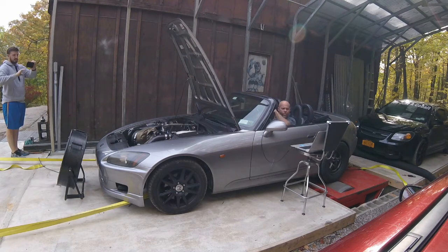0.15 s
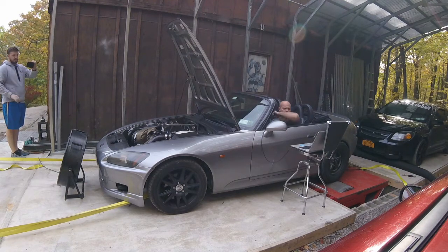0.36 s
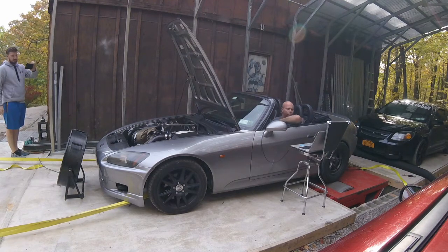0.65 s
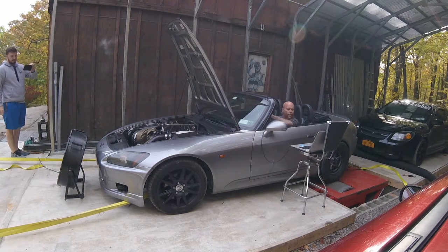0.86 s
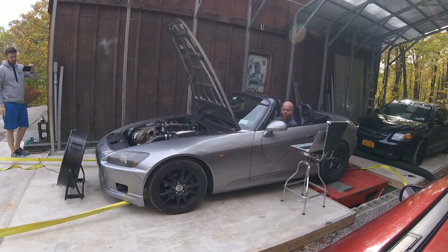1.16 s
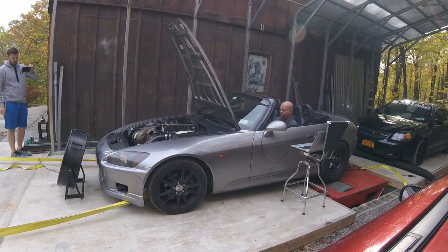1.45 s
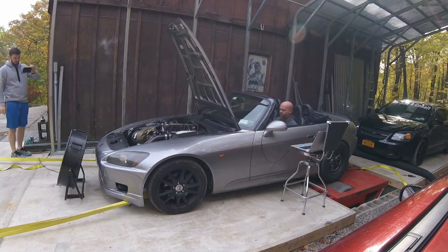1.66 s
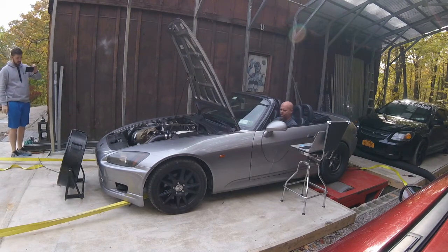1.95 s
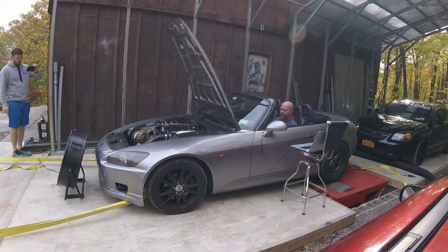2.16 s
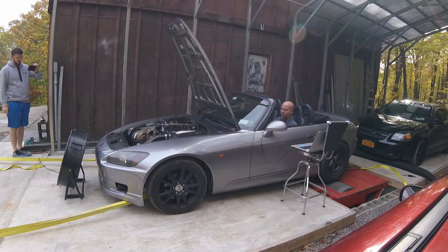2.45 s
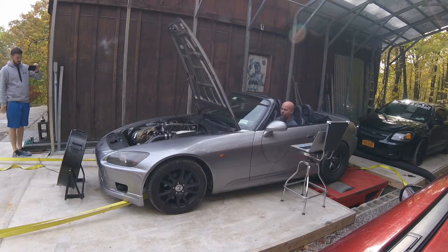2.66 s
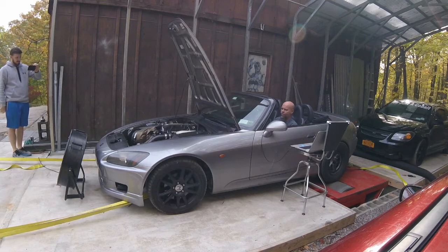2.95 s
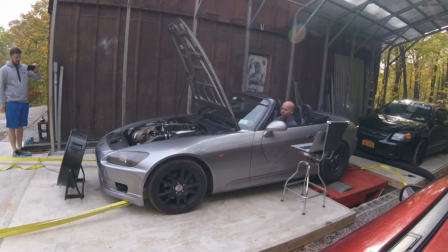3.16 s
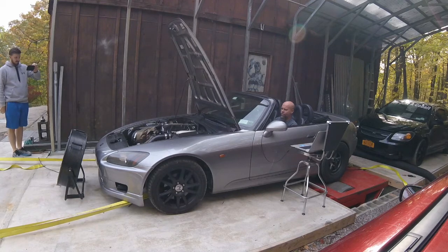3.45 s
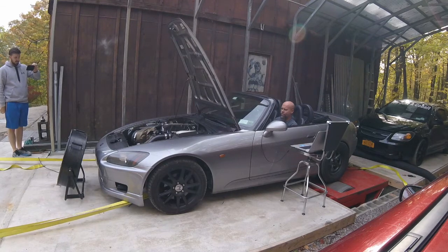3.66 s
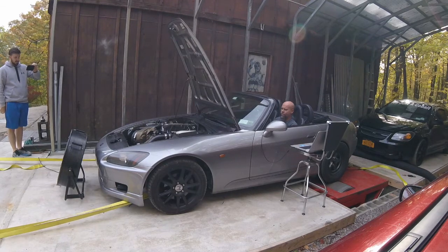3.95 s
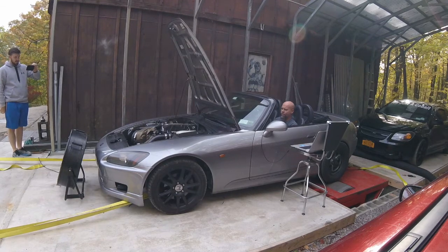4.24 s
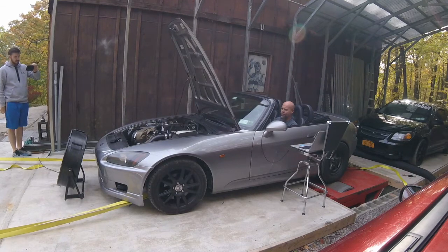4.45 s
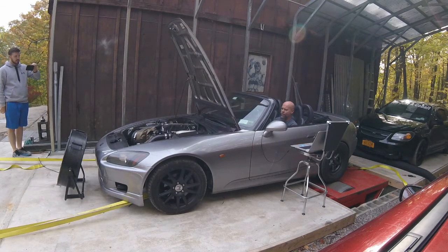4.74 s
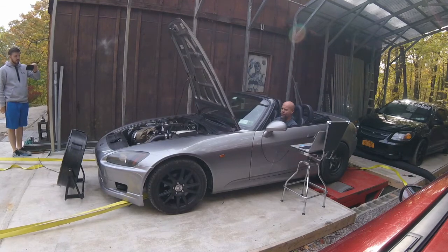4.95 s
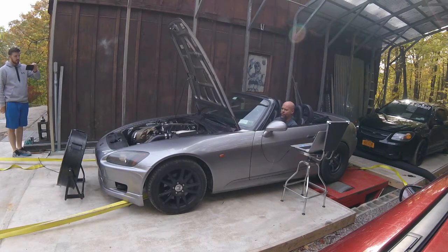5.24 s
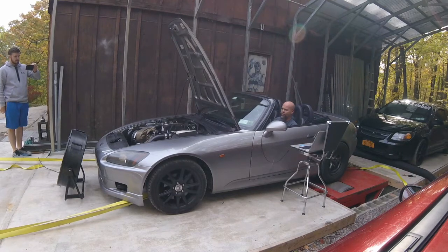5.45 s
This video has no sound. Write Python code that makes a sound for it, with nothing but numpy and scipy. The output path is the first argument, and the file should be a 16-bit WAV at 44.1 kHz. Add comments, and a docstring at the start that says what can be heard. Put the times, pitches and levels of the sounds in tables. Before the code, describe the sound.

Low, bassy exhaust throb with raspy puffs and light mechanical rattle from an open engine bay holds briefly, then the revs nearly double in one continuous sweep. Boom and burble pass through resonances, surging and sagging slightly, while turbo hiss and singing intake tones brighten and grow loud. Short reverberation of a semi-open shed; close mono pickup on the left, right side practically silent.

```python
"""A turbocharged four-cylinder car on a chassis dynamometer in an open shed, one microphone a few metres off.
It cruises near 1900 rpm: the exhaust booms on the firing rate and burbles on its quarters, noise puffs rasp
in the pipe, and under the open bonnet the valve gear clatters and meshing teeth whine.
From about 1.3 s it pulls, reaching about 3700 rpm: the lines sweep through the resonances of pipe and shed,
single lines flare, and the turbo's filtered noise grows and brightens with boost over singing intake pipes."""
import sys
import numpy as np
from scipy import signal
from scipy.fft import rfft, irfft, next_fast_len
from scipy.io import wavfile

SR = 44100
rng = np.random.default_rng(int(sys.argv[2]) if len(sys.argv) > 2 else 0)


def log_audio(samples):
    """Write samples as a 16-bit WAV file to the path given in sys.argv[1]."""
    # one column per channel
    frames = np.atleast_2d(samples).T
    # limit to full scale, then quantise
    limited = np.clip(frames, -1, 1)
    pcm = np.round(limited * 32767).astype(np.int16)
    wavfile.write(sys.argv[1], SR, pcm)


N = 246078  # samples

CRUISE_HZ = 63.03  # firings a second before the pull


def amp(db):
    """Decibels to gain."""
    return 10 ** (np.asarray(db) / 20)


def unit(x):
    """Scale to rms 1."""
    return x / np.sqrt(np.mean(x ** 2) + 1e-20)


def along(points, hz):
    """Interpolate (Hz, value) points on a log frequency axis."""
    point_hz, value = np.transpose(points)
    return np.interp(np.log(hz + 1), np.log(point_hz + 1), value)


def curves(rows):
    """One value per sample for each column after the time."""
    time_s, *columns = np.transpose(rows)
    return [np.interp(np.arange(N) / SR, time_s, column) for column in columns]


def wobble(rate):
    """A smooth random curve, rate knots a second."""
    knots = rng.standard_normal(int(N * rate / SR) + 4)
    fine = signal.resample_poly(knots, 16, 1)
    return np.interp(np.arange(N) * rate / SR, np.arange(len(fine)) / 16, fine)


def filtered(x, response):
    """Multiply the spectrum of x by a response of frequency."""
    size = next_fast_len(N + SR // 2)  # padded, so that the end does not wrap onto the start
    hz = np.fft.rfftfreq(size, 1 / SR)
    return irfft(rfft(x, size) * response(hz), size)[:N]


def coloured(x, spectrum):
    """Pass x through a smooth spectrum, at rms 1."""
    return unit(filtered(x, lambda hz: amp(along(spectrum, hz))))


def peaks(modes, hz, skirt=1.5):
    """Gain of a set of resonances, summed in power; a larger skirt makes their sides steeper."""
    power = sum(amp(2 * db) / (1 + (2 * (hz - centre) / width) ** 2) ** skirt
                for centre, width, db in modes)
    return np.sqrt(power)


def resonant(x, modes):
    """Pass x through a set of resonances, at rms 1."""
    return unit(filtered(x, lambda hz: peaks(modes, hz)))


def puffs(count, cylinder_db, scatter_db, decay, diffuse):
    """Noise that bursts at each firing, unequal by cylinder, over a steady share scattered by the shed."""
    index = count.astype(int)
    size_db = np.asarray(cylinder_db)[index % 4] + scatter_db * rng.standard_normal(4096)[index]
    burst = unit(amp(size_db) * np.exp(-(count % 1) / decay))  # decay in firing intervals
    return unit(np.hypot(burst, diffuse) * rng.standard_normal(N))


def firing_rate():
    """Firings a second: a steady cruise, then the dynamometer lets the revs climb near-exponentially."""
    start_s, ease_s = 1.316, .197
    octaves_per_s, quickens_per_s = .1998, .0285
    pulling_s = ease_s * np.logaddexp(0, (np.arange(N) / SR - start_s) / ease_s)
    return CRUISE_HZ * 2 ** (octaves_per_s * pulling_s * (1 + quickens_per_s * pulling_s))


def effort(firing_hz, cruise_db, surge_db, octave_db, steepness, early_s=0):
    """Level in dB of a layer: cruise, a passing surge (early_s ahead), and octave_db more at twice the revs."""
    peak_s, rise_s, fall_s, recover_s = 2.403, 1.47, 0.33, 0.99
    sag_share = 0.21  # depth of the sag over the height of the surge
    corners_s = peak_s - early_s + np.array([-rise_s, 0, fall_s, fall_s + recover_s])
    surge = np.interp(np.arange(N) / SR, corners_s, [0, 1, -sag_share, 0])
    climb = np.abs(np.log2(firing_hz / CRUISE_HZ)) ** steepness
    return cruise_db + surge_db * surge + octave_db * climb


def shed(x, wet_db):
    """The direct sound plus the answer of walls and roof: noise dying away at its own rate in each band."""
    # reverberation of the shed: frequency_hz, t60_s
    reverberation = [(200, 0.33), (2000, 0.26), (10000, 0.067)]
    hz, t, bands = signal.stft(rng.standard_normal(SR // 2), SR, nperseg=256)
    decay = amp(-60 * t / along(reverberation, hz)[:, None])
    tail = signal.istft(bands * decay, SR, nperseg=256)[1]
    return x + amp(wet_db) * signal.fftconvolve(x, tail / np.linalg.norm(tail))[:N]


def whine(firing_hz, load, wander=0.00249, haze_db=3.5, haze_load_db=-4):
    """Meshing teeth sing a wavering line and its octave; rattle in their play blurs it, less under load."""
    # level of the whine at each pitch, falling steeply above 6.5 kHz: frequency_hz, relative level_db
    whine_level = [(3200, -55.5), (3550, -55.5), (4000, -54.5), (4650, -53.5), (5500, -50.5), (5950, -46.5),
                   (6500, -59), (6900, -77), (7600, -90.5)]
    mesh_per_firing = 51.8
    turn = 2 * np.pi * mesh_per_firing * np.cumsum(firing_hz * (1 + wander * wobble(7))) / SR
    haze = amp(haze_db + haze_load_db * load)

    def band(k, width):
        return unit(wobble(width) * np.cos(k * turn) + wobble(width) * np.sin(k * turn))

    def line(k):
        core = band(k, 85)
        blur = unit(band(k, 200) + band(k, 600))
        return core + haze * blur

    return sum(amp(along(whine_level, k * mesh_per_firing * firing_hz)) * line(k) for k in (1, 2))


def intake(firing_hz, off_speed_db=-58, flutter_db=1.0):
    """Each intake resonance rings on noise, swells as the revs pass its own speed, and flutters with the flow."""
    # intake pipe resonances: frequency_hz, width_hz, relative level_db, best speed in firings a second
    pipes = [(920, 41, -11.5, 98), (1040, 150, -6, 87.5), (1450, 130, -8.5, 99), (2115, 300, -11, 99),
             (3670, 65, -14.5, 89), (4140, 450, -15, 99), (4470, 130, -17, 81), (4830, 150, -10, 101),
             (7650, 80, -27, 120), (9540, 230, -32, 106)]
    out = np.zeros(N)
    for hz, width, db, best_hz in pipes:
        level_db = db + off_speed_db * np.log2(firing_hz / best_hz) ** 2 + flutter_db * wobble(6)
        out += amp(level_db) * resonant(rng.standard_normal(N), [(hz, width, 0)])
    return out


def turbo(count, firing_hz, load, air_db=-1.77, sizzle_db=-7.5, boost_from=0.9):
    """Air rushes through the compressor, brighter with boost, and sets the intake pipes singing."""
    # air noise at cruise and toward full boost: frequency_hz, relative level_db
    air_cruise = [(1500, -42), (3000, -15), (4000, -9), (4600, -2.5), (5700, -2.5), (6500, -2.5),
                  (6850, -11), (8000, -16.5), (9100, -23), (10900, -27.5), (12200, -34), (15000, -59)]
    air_boost = [(1500, -22), (2300, -10), (3200, -11.5), (4100, -8.5), (4700, -4), (5400, -4), (6450, -4),
                 (6850, -14.5), (8000, -14.5), (9100, -21.5), (10900, -21.5), (12200, -35), (14200, -26),
                 (15000, -55.5)]
    # narrow sizzle in the air noise: frequency_hz, width_hz, relative level_db
    sizzle_modes = [(6240, 490, 4), (6420, 150, 4.5)]
    level_db = effort(firing_hz, cruise_db=-46.0, surge_db=5.0, octave_db=19.5, steepness=1.96)
    boost = np.clip(load - boost_from, 0, 1)
    flow = puffs(count, [.5, 0, -.5, 0], scatter_db=3, decay=.9, diffuse=2.4)
    rush = (1 - boost) * coloured(flow, air_cruise) + boost * coloured(flow, air_boost)
    sizzle = resonant(rng.standard_normal(N), sizzle_modes)
    return amp(level_db) * (amp(air_db) * rush + amp(sizzle_db) * sizzle + intake(firing_hz))


def clatter(count, firing_hz):
    """Valves and injectors rattle the block in step with the firings."""
    # spectrum of the rattling block: frequency_hz, relative level_db
    block = [(20, -55), (300, -5), (650, -0.5), (1000, -2.5), (1300, -4), (1750, -5), (2200, -4.5),
             (2900, -8), (3800, -9.5), (6000, -21.5), (9000, -45), (14000, -64.5)]
    level_db = effort(firing_hz, cruise_db=-39.5, surge_db=3.0, octave_db=10.5, steepness=3.96)
    rattle = puffs(count, [3.0, -1.5, -4.5, -1.5], scatter_db=2.5, decay=0.98, diffuse=3.6)
    return amp(level_db) * coloured(rattle, block)


def rasp(count, firing_hz, load, load_db=-7.5):
    """Each blow-down puffs turbulence through the pipe; under load more of it turns into clean lines."""
    # spectrum of the gas noise from the pipe: frequency_hz, relative level_db
    pipe = [(15, -12.5), (40, -4), (110, 1.5), (200, -2.5), (280, -3), (350, -5), (450, -0.5), (600, -9.5),
            (850, -13.5), (1300, -20), (3000, -62.5), (8000, -100)]
    level_db = effort(firing_hz, cruise_db=-34.5, surge_db=3.0, octave_db=17.5, steepness=3.55, early_s=.11)
    gas = puffs(count, [2, -0.63, 0.76, -2], scatter_db=1.0, decay=.5, diffuse=1.3)
    return amp(level_db + load_db * load) * coloured(gas, pipe)


def flare(multiple):
    """Amplitude, every 64 samples, that one burble line gains while it rings out as the revs pass."""
    # flaring lines: multiple of the firing rate, centre_s, length_s between -6 dB points, relative level_db
    flares = [(5, 1.69, 0.31, -38.5), (1.5, 1.85, .4, -30.5), (3, 1.99, 0.5, -33.5), (2.75, 2.1, .2, -42),
              (7, 2.6, .2, -41), (3.75, 2.24, 0.42, -38), (5, 2.12, .25, -42.5), (6, 2.29, 0.3, -42),
              (4.5, 2.27, 0.34, -42), (3.5, 3.15, .45, -44), (3, 3.9, .25, -42.5), (3.75, 3.98, 0.32, -44),
              (4, 3.84, 0.33, -40.5), (5.5, 4.4, .5, -43), (3.5, 4.65, 0.25, -39.5),
              (2.75, 4.7, 1.0, -41.5), (9, 4.9, 0.45, -51), (3.25, 5.02, 0.57, -43),
              (2.5, 5.14, 0.39, -38.5), (5, 5.07, 0.54, -46), (3, 5.3, 0.43, -33), (4, 5.3, 0.28, -45),
              (8, 7, 0.41, -43), (4.5, 5.52, 0.29, -40), (2.25, 6, 0.19, -30)]
    t = np.arange(0, N, 64) / SR
    out = np.zeros(len(t))
    for k, centre_s, length_s, db in flares:
        if abs(k - multiple) < 1 / 8:
            out += amp(db - 6 * (2 * (t - centre_s) / length_s) ** 2)
    return out


def burble(count, firing_hz, load, waver_db=1.1):
    """Unequal cylinders put lines on quarters of the firing rate, which follow load and standing waves."""
    # engine lines: multiple of the firing rate, unloaded relative level_db, the same at top_load
    orders = [(0.75, -53.5, -42), (1.25, -43, -57), (1.5, -45.5, -37), (1.75, -53, -42.5),
              (2.25, -72.5, -37), (2.5, -50.5, -32.5), (2.75, -55.5, -32.5), (3.0, -31, -36),
              (3.25, -52, -33), (3.5, -33.5, -43.5), (3.75, -37.5, -46.5), (4.0, -35.5, -45.5),
              (4.25, -44, -50.5), (4.5, -36.5, -50), (4.75, -44.5, -47.5), (5.0, -45.5, -42),
              (5.25, -55.5, -49.5), (5.5, -58.5, -45), (5.75, -52.5, -45.5), (6.0, -50, -49.5),
              (6.5, -59.5, -44.5), (6.75, -62.5, -40), (7.0, -54, -48), (7.5, -54, -50.5), (8.0, -52, -47),
              (9.0, -57.5, -46), (10.0, -51, -44.5), (11.0, -58, -54.0), (12.0, -55.5, -54.5),
              (13.0, -63, -56), (14.0, -56.5, -52.5)]
    # standing waves of pipe and shed, lighting up lines that sweep through: frequency_hz, width_hz, gain_db
    standing = [(82.4, 8, 7), (98.7, 9.3, 10), (132, 39, 3), (185.3, 9.5, -3.5), (207.6, 11.6, -2.5),
                (264.5, 15, -9.5), (283.4, 17, -9), (327, 12, -10), (343, 13, -7.5), (357, 32, -4.5),
                (429, 29, -5.5), (506, 22, -5), (558, 59, -4.5), (705, 84, -3), (927, 48, -1),
                (1030, 90, -7.5), (1470, 140, 2.5)]
    top_load = 1.36
    level_db = effort(firing_hz, cruise_db=-0.5, surge_db=3.5, octave_db=-0.5, steepness=1, early_s=0.12)
    out = np.zeros(N)
    for multiple, light_db, loaded_db in orders:
        line_db = light_db + (loaded_db - light_db) * load / top_load
        lit = peaks(standing, multiple * firing_hz[::64]).repeat(64)[:N]
        steady = amp(level_db + line_db + waver_db * wobble(9)) * lit
        size = np.hypot(steady, flare(multiple).repeat(64)[:N])
        phase = 2 * np.pi * (multiple * count + rng.random()) + .15 * wobble(16)
        out += size * np.cos(phase)
    return np.sqrt(2) * out


def boom(count, firing_hz, lead_per_hz=0.023):
    """The firing rate and its octave sweep through the tailpipe's resonances."""
    # exhaust resonances: frequency_hz, width_hz, relative level_db
    tailpipe = [(70.1, 12.6, -22.5), (74.8, 1.2, -18), (76.3, 2.4, -19), (79.3, 8.4, -14.5),
                (85.4, 8, -15.5), (94.6, 8.7, -14.5), (101, 7.4, -17), (111, 6.3, -24), (125.4, 6, -26.5),
                (136.05, 9.2, -19.5), (163.6, 13, -38), (175.7, 6.9, -27.5), (183.7, 5, -29.5),
                (205.6, 9, -30.5), (220.2, 11.8, -29), (241.7, 6.7, -33)]
    turn = 2 * np.pi * count
    lead = lead_per_hz * (firing_hz - CRUISE_HZ)  # the pipe turns the octave's phase as the revs climb
    fundamental = peaks(tailpipe, firing_hz) * np.cos(turn)
    octave = peaks(tailpipe, 2 * firing_hz) * np.cos(2 * turn + lead)
    return np.sqrt(2) * (fundamental + octave)


def scene():
    """Every layer follows the same firing rate and is heard in the left channel only."""
    # throttle and boost: time_s, load (0 cruising, 1 pulling, 2 full boost)
    load_points = [(0, 0), (1.4, 0), (2.1, 0.35), (4.5, 1.02), (5.58, 1.42)]
    firing_hz = firing_rate()
    load, = curves(load_points)
    count = np.cumsum(firing_hz) / SR  # firings so far
    bay = clatter(count, firing_hz) + turbo(count, firing_hz, load) + whine(firing_hz, load)
    bay = shed(bay, wet_db=-14)
    exhaust = boom(count, firing_hz) + burble(count, firing_hz, load) + rasp(count, firing_hz, load)
    near_silence = amp(-99) * rng.standard_normal(N)  # the right channel is practically silent
    return np.array([2 * (exhaust + bay), near_silence])


def record(dry):
    """Short 3 ms fades at both ends avoid clicks; nothing is kept above the band limit."""
    top_hz = 14900
    edge_s = np.minimum(np.arange(N), np.arange(N)[::-1]) / SR
    fade = np.clip(edge_s / .003, 0, 1)
    return np.array([filtered(channel * fade, lambda hz: hz < top_hz) for channel in dry])


dry = scene()
out = record(dry)
log_audio(out)
```